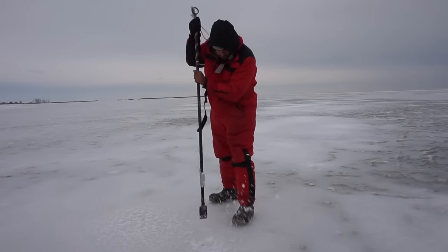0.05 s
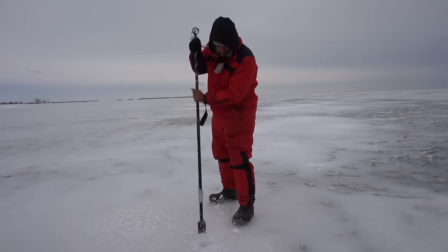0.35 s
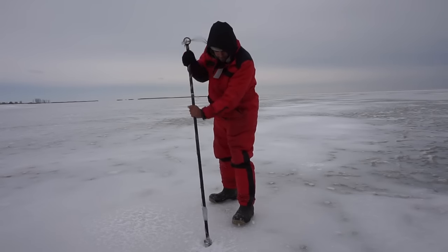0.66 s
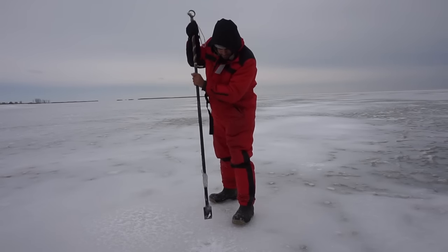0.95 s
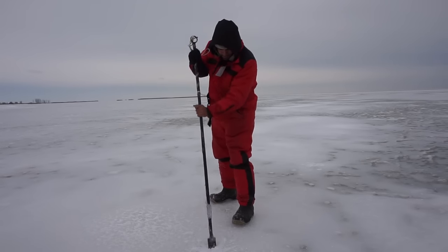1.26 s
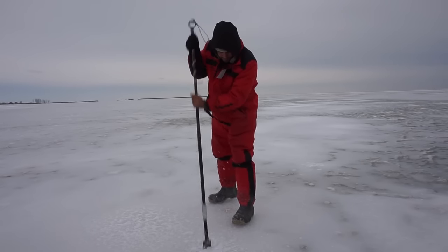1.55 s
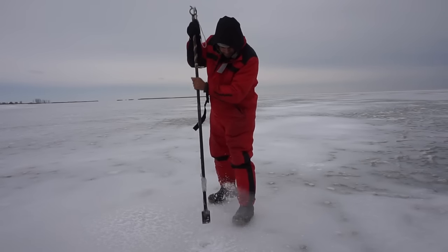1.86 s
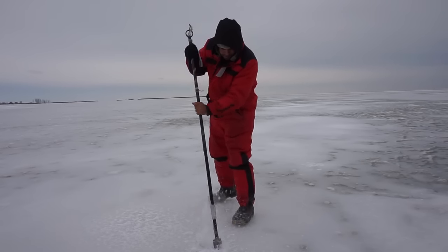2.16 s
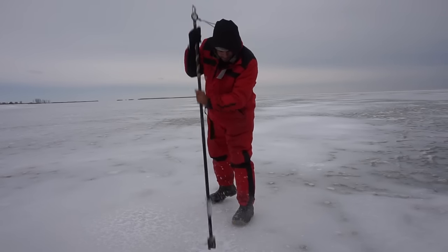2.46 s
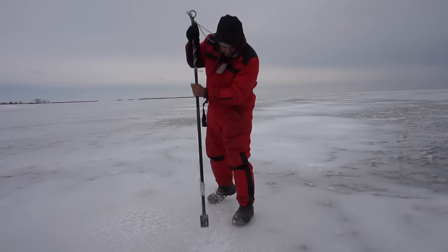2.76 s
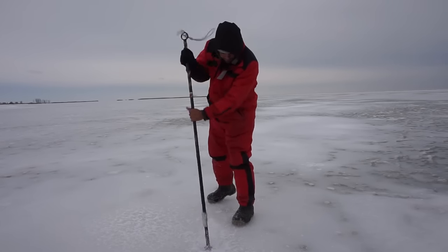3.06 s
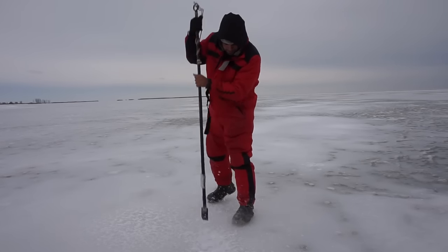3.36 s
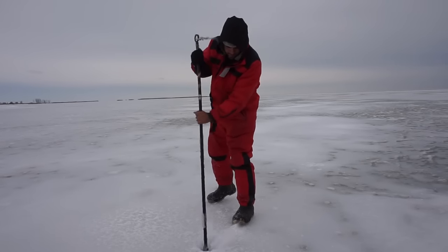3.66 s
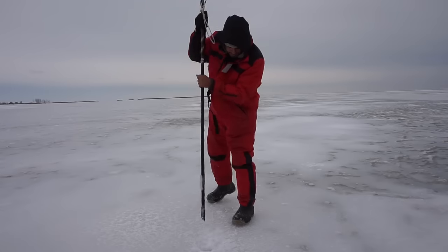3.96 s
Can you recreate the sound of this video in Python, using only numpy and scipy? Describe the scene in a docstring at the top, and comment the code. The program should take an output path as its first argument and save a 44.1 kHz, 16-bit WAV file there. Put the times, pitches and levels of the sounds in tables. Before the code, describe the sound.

A long steel bar chops into lake ice in steady blows, with wind buffeting.

```python
"""Wind rumbles, buffets and ticks on a pair of close microphone ports throughout, and boots scuff on lake ice.
From 0.25 s a long steel bar is driven in eight times, about twice a second: each blow crushes the ice for a few
hundredths of a second and rings the hand-damped bar. Chips scatter and tinkle, loudest after the first blow.
From 1 s the wind also slaps the ports. Near the end the boots scuff again and three dull knocks sound on the
ice."""
import sys
import numpy as np
from scipy import signal
from scipy.fft import rfft, irfft
from scipy.io import wavfile
from scipy.ndimage import uniform_filter1d

SR = 44100
rng = np.random.default_rng(int(sys.argv[2]) if len(sys.argv) > 2 else 0)


def file_out(sig):
    """Save sig as 16-bit WAV at sys.argv[1]."""
    # one column per channel
    cols = np.atleast_2d(sig).T
    # limit, then scale
    lim = np.clip(cols, -1, 1)
    pcm = np.round(lim * 32767).astype(np.int16)
    wavfile.write(sys.argv[1], SR, pcm)


N = 176400

# spectra of crushed ice, fine grit and pressure cusps: frequency_hz, relative_density_db
CRUNCH_SPECTRUM = [(300, -9.5), (720, -10), (1050, -14.5), (1450, -1.5), (2000, 3.5), (2550, -2),
                   (3300, -14), (3900, -18), (4900, -43), (9000, -37)]
FIZZ_SPECTRUM = [(3000, -62), (5000, -21), (6500, -15), (8000, -6), (9600, -1), (11500, 4.5), (13200, 0.5),
                 (15000, -9), (16500, 0)]
TICK_SPECTRUM = [(300, -5.5), (700, 18), (1020, 3.5), (1500, 10), (2100, 3.5), (3000, -20.5), (4500, -41)]
CRUNCH_PAN_DB, DEBRIS_PAN_DB, DEBRIS_WIDTH = -5, -2.5, 0.57


def blows():
    """Impact excitation: the blade crushes and splinters the ice, and the fractures ring the steel."""
    # start_s, attack_s, bite_s, crunch_db, splinter_db, bar_db, blade_db
    strikes = [(0.249, 0.00065, 0.025, -24.5, -28.5, -42, -41),
               (0.7365, 0.0053, 0.0041, -27.5, -35, -38, -47),
               (1.2174, 0.0039, 0.015, -25.5, -29, -31, -23),
               (1.678, 0.0049, 0.022, -29.5, -36.5, -36, -53),
               (2.1385, 0.0047, 0.018, -32, -38.5, -37, -30), (2.5876, .004, 0.024, -34.5, -36, -39, -34),
               (3.11, 0.0046, 0.032, -30, -33, -31.5, -39), (3.68, 0.0091, 0.03, -31.5, -35, -35, -68)]
    # frequency_hz, relative_density_db
    splinter_spectrum = [(3000, -47), (5000, -22), (6300, -11.5), (7900, -4.5), (9400, 4), (12300, 4),
                         (15000, -10.5), (16500, -16)]
    soft_attack_s = 0.012  # soft ice yields slowly and crumbles longer: this attack doubles the decay

    def bites(layer, base_t60_s):
        return sum(amp(levels_db[layer]) * burst(s, attack, bite, base_t60_s * (1 + attack / soft_attack_s))
                   for s, attack, bite, *levels_db in strikes)
    crush, splinter, shake, ping = [bites(k, t60) for k, t60 in enumerate((0.057, 0.039, 0.02, 0.01))]
    cracking = cracks()
    steel = steel_bar(shake, ping)
    crunch = colour(crush * fractures() * swell(depth_db=1.7, rate_hz=220), CRUNCH_SPECTRUM)
    diffuse = 0.24 * colour(crush * fractures(), CRUNCH_SPECTRUM)
    body = delay_right(place(crunch + steel, diffuse, CRUNCH_PAN_DB), lag_s=25e-6)
    spray = place(splinter * fractures(), 0.5 * splinter * fractures(), pan_db=-0.3)
    return body + colour(spray, splinter_spectrum) + cracking


def steel_bar(shake, ping):
    """Modal resonance: noise under two envelopes drives the bar's damped modes and the blade's ping."""
    # pitch_hz, relative_db, t60_s
    modes = [(1363, -9.5, 0.21), (1490, 0.5, 0.079), (1880, 1, 0.11), (2150, -4.5, 0.15),
             (2310, 7.5, 0.063), (2620, -14.5, 0.15), (2763, 4, 0.02), (2890, 6, 0.057), (3230, 1, 0.057),
             (6600, -26, .06), (9500, -19, 0.14)]
    blade_hz, blade_t60_s = 1756, 0.055
    white = rng.standard_normal(N)  # sets the bar's modes together, and the blade, to unit gain for noise
    bar_gain = np.std(sum(amp(db) * ring(white, hz, t60) for hz, db, t60 in modes))
    blade_gain = np.std(ring(white, blade_hz, blade_t60_s))
    bar = sum(amp(db) * ring(shake * rng.standard_normal(N), hz, t60) for hz, db, t60 in modes)
    blade = ring(ping * fractures(), blade_hz, blade_t60_s)
    return bar / bar_gain + blade / blade_gain


def cracks():
    """Brittle failure: larger cracks within the blows radiate brief broadband snaps."""
    # start_s, level_db
    snaps = [(0.2495, -11), (0.2553, -15), (0.2728, -17), (0.2773, -16), (0.7423, -17), (1.2250, -17.5),
             (1.7012, -25.5), (2.1450, -19), (3.1247, -21.5)]
    # frequency_hz, relative_density_db
    spectrum = [(500, -29), (1100, -23.5), (1700, -4.5), (2600, 9), (3600, -13.5), (4900, -33), (6500, -17),
                (10000, -11.5), (15000, -13.5)]
    envelope = sum(amp(db) * burst(s, 0, 0.00058, t60_s=0.017) for s, db in snaps)
    return place(colour(envelope * fractures(), spectrum), 0, pan_db=-5.5)


def fractures():
    """Acoustic emission: ice gives way in tiny fractures that merge into a dense crackle."""
    return even(grains(per_s=5000, spread_db=0), span_s=0.004)


def chips():
    """Free vibration: each landing chip gives a short glassy ring, and grit as it shatters a little."""
    # start_s, level_db, pitch_hz, t60_s
    landings = [(.0278, -43, 13200, .012), (.0690, -25, 13100, 0.0086), (0.1066, -16.5, 11460, 0.011),
                (0.126, -27, 12700, 0.017), (.2074, -36, 13400, .012), (0.372, -23, 10200, 0.0087),
                (0.393, -19.5, 10860, 0.011), (0.414, -29, 12400, .03), (0.421, -24, 9250, 0.012),
                (0.4364, -28.5, 10100, 0.014), (.4519, -26, 9960, 0.011), (0.4864, -11.5, 9500, 0.013),
                (0.6056, -29, 13200, 0.031), (0.6163, -31, 11700, 0.042), (.7965, -30, 9900, 0.0068),
                (0.8828, -29.5, 10340, .01), (1.784, -31.5, 10940, .012), (2.4153, -34.5, 11860, 0.028),
                (2.6768, -36, 11260, 0.022), (2.9995, -39.5, 10040, 0.015), (3.6012, -34.5, 11200, 0.013)]
    rings, shatter = np.zeros(N), np.zeros(N)
    for s, db, hz, t60 in landings:
        rings += amp(db - 2) * np.sin(2 * np.pi * hz * (seconds() - s)) * burst(s, 0.0014, 0.00077, t60)
        shatter += amp(db - 3.5) * burst(s, 0.0005, 0.00075, t60_s=0.0083)
    grit = 0.55 * colour(shatter * fractures(), FIZZ_SPECTRUM)
    return place(rings + grit, 0, pan_db=-4.5)


def debris():
    """Shot noise: the many small impacts of sliding crumbs add up to a fizz and a lower rustle."""
    # time_s, fizz_db, rustle_db
    levels = [(0, -42.5, -54), (.22, -37, -52), (.3, -36.5, -43.5), (.35, -44.5, -56.5), (.42, -33, -48.5),
              (.54, -46.5, -57), (.69, -39, -49.5), (.8, -45.5, -58.5), (1.08, -47.5, -57),
              (1.27, -59, -61.5), (1.6, -61, -62.5), (1.84, -58, -65), (1.89, -59.5, -56),
              (2.08, -62, -64.5), (2.2, -54.5, -60), (2.5, -57.5, -61.5), (2.65, -54, -58), (2.8, -67, -72),
              (3.05, -60.5, -67), (3.18, -47.5, -52), (3.3, -56.5, -57.5), (3.45, -49.5, -57.5),
              (3.62, -52, -60), (3.8, -54, -53.5), (4, -57, -65.5)]
    # frequency_hz, relative_density_db
    rustle_spectrum = [(900, -16.5), (1500, -1.5), (2400, 7.5), (3300, -3), (4500, -22.5), (7000, -53)]

    def skitter(spectrum):
        mid, side = [even(grains(per_s=3500, spread_db=3.5), span_s=0.2) for _ in range(2)]
        return colour(place(mid, DEBRIS_WIDTH * side, DEBRIS_PAN_DB), spectrum)
    fizz_gain, rustle_gain = in_time(levels)
    showers = swell(depth_db=3, rate_hz=36.3)
    fizz = amp(-3) * skitter(FIZZ_SPECTRUM) + amp(-6.5) * tinkles()
    rustle = swell(depth_db=2, rate_hz=18) * skitter(rustle_spectrum)
    return showers * (fizz_gain * fizz + rustle_gain * rustle)


def tinkles():
    """Impulse responses: random impacts ring tiny pieces of ice, scattered left and right."""
    pitches_hz = np.geomspace(8900, 13400, 30)
    rings = np.zeros((2, N))
    for k, hz in enumerate(pitches_hz):
        impacts = grains(per_s=980 / len(pitches_hz), spread_db=4.5)
        rings += place(ring(impacts, hz, t60_s=0.012), 0, DEBRIS_PAN_DB + 3 * (-1) ** k)
    return even(rings, span_s=0.13)


def knocks():
    """Damped impacts: three dull clacks on the crushed ice near the end."""
    # start_s, level_db, t60_s
    falls = [(3.558, -46, 0.028), (3.777, -36, 0.064), (3.808, -47, 0.047)]
    envelope = sum(amp(db) * burst(s, 0.001, 0.0013, t60) for s, db, t60 in falls)
    return place(colour(envelope * fractures(), CRUNCH_SPECTRUM), 0, CRUNCH_PAN_DB)


def scuffs():
    """Fracture under load: the crust breaks beneath the boots in short crunches."""
    # start_s, level_db, t60_s
    steps = [(0.104, -36, 0.049), (.185, -44, 0.05), (0.206, -35.5, 0.062), (.371, -37, 0.015),
             (.389, -34.5, 0.039), (0.417, -40, 0.11), (3.258, -41, 0.017), (3.3725, -36, 0.03),
             (3.870, -32.5, 0.0051)]
    # frequency_hz, relative_density_db
    spectrum = [(900, -32), (1500, -4.5), (2400, 3), (3500, -1), (4700, -30.5), (5900, -1), (7500, -15),
                (10000, -7), (15000, -20)]
    load = sum(amp(db) * burst(s, 0.0026, 0.00067, t60) for s, db, t60 in steps)
    return colour(place(load * fractures(), DEBRIS_WIDTH * load * fractures(), DEBRIS_PAN_DB), spectrum)


def wind():
    """Turbulent pressure on the ports: rumble with thumping eddies, buffeting, flutter and ticks."""
    # time_s, buffet_db, flutter_db
    gust_levels = [(0, -29, -52), (.15, -29, -61), (.27, -27.5, -42), (.36, -31, -87), (.49, -27, -40),
                   (.57, -29, -61), (.7, -27, -39.5), (.9, -27.5, -47.5), (1.07, -24, -38),
                   (1.17, -24.5, -39), (1.37, -25.5, -31.5), (1.42, -29, -40), (1.47, -31, -60.5),
                   (1.58, -23.5, -32), (1.72, -27.5, -49), (1.9, -24.5, -40), (1.98, -30.5, -45.5),
                   (2.2, -25.5, -40.5), (2.38, -26, -40.5), (2.52, -25.5, -41), (2.8, -27, -43.5),
                   (3.2, -24.5, -40), (3.32, -28.5, -49.5), (3.6, -25.5, -42.5), (4, -25.5, -49)]
    # time_s, level_db
    rumble_levels = [(0, -26.5), (.4, -22), (.7, -29), (.95, -19.5), (1.35, -27.5), (1.7, -25.5),
                     (2.05, -28), (2.4, -25.5), (2.9, -25), (3.4, -23.5), (4, -21)]
    # centre_s, level_db, half_length_s
    eddies = [(0.488, -17, 0.016), (1.003, -20, 0.035), (1.233, -16, .012), (1.288, -14, 0.019),
              (1.398, -14.5, 0.017), (1.536, -15, 0.023), (1.843, -18, 0.028), (3.094, -13, 0.0094)]
    # three bands of turbulence: frequency_hz, relative_density_db
    rumble_spectrum = [(12, -38), (25, -16), (40, -2.5), (60, 3), (80, 2), (110, -12), (200, -42),
                       (400, -81.5)]
    buffet_spectrum = [(50, -33), (110, -9), (180, 1), (310, -0.5), (400, -8), (520, -16.5), (800, -26),
                       (1500, -102.5)]
    flutter_spectrum = [(250, -11), (450, 2.5), (750, -8), (1020, -12.5), (1500, -13), (2200, -28),
                        (3200, -76), (4800, -62)]
    buffet_gain, flutter_gain = in_time(gust_levels)
    eddy_power = sum(amp(db) ** 2 * np.exp(-((seconds() - s) / half) ** 2) for s, db, half in eddies)
    rumble_power = in_time(rumble_levels)[0] ** 2 + eddy_power
    flutter = amp(-2) * port_ticks() + amp(-2.5) * turbulence(flutter_spectrum)
    rumble = np.sqrt(rumble_power) * turbulence(rumble_spectrum)
    lumps = swell(depth_db=1, rate_hz=14)
    return rumble + lumps * (buffet_gain * turbulence(buffet_spectrum) + flutter_gain * flutter)


def turbulence(spectrum):
    """Convection: pressure noise sweeps past the left port, then the right, staying partly coherent."""
    # likeness of the two ports: frequency_hz, coherence, left_lead_rad
    ports = [(30, 0.85, .2), (62.5, 0.85, 0.37), (106, 0.88, 0.93), (205, 0.4, 1.62), (340, .62, 2.204),
             (700, 0.61, 2.6), (1500, 0.49, 2.4)]
    coherence, lead = per_bin(ports)
    left, independent = rfft(rng.standard_normal((2, 2 * N)))
    right = (coherence * left + np.sqrt(1 - coherence ** 2) * independent) * np.exp(-1j * lead)
    pressure = irfft(np.array([left, right]) * amp(per_bin(spectrum)[0]))[:, :N]
    return even(rms_one(pressure), span_s=0.054)


def port_ticks():
    """A random pulse train: pressure cusps, sizes spread evenly in dB, in antiphase at the two ports."""
    per_s, spread_db = 120, 39.5
    gaps, sizes, signs = rng.random((3000, 3)).T
    at = (np.cumsum(2 * gaps) / per_s * SR).astype(int)
    heights = amp(-spread_db * sizes) * np.sign(signs - 0.5)
    clicks = np.zeros(N)
    clicks[at[at < N]] = heights[at < N]
    ticks = colour(rms_one(clicks), TICK_SPECTRUM)
    return place(0.45 * ticks, -ticks, pan_db=2)


def wind_slaps():
    """Pressure impulses: the hardest single cusps of the wind, in antiphase at the two ports."""
    # start_s, relative_db
    slaps = [(1.029, -18), (1.482, -27), (1.622, -15), (2.016, -19), (2.351, -10.5), (2.7728, -15.5),
             (2.7998, -15), (2.8748, -15.5), (2.996, -17), (3.223, -9.5)]
    clicks = np.zeros(N)
    for s, db in slaps:
        clicks[int(s * SR)] = amp(db)
    cusps = 2.2 * colour(clicks, TICK_SPECTRUM)
    return place(0.4 * cusps, -cusps, pan_db=1.5)


def amp(db):
    """Decibels to amplitude ratio."""
    return 10 ** (np.asarray(db) / 20)


def rms_one(x):
    """Normalisation to rms 1."""
    return x / np.sqrt(np.mean(x ** 2) + 1e-20)


def seconds():
    """Time of each sample."""
    return np.arange(N) / SR


def in_time(rows):
    """Gain curves interpolated in decibels from rows of time_s, level_db, ..."""
    s, *columns = np.transpose(rows)
    return [amp(np.interp(seconds(), s, c)) for c in columns]


def per_bin(rows):
    """A table's columns interpolated in log frequency at every FFT bin."""
    hz, *columns = np.transpose(rows)
    bin_hz = np.arange(N + 1) * SR / (2 * N)
    return [np.interp(np.log(bin_hz + 1), np.log(hz), c) for c in columns]


def colour(x, spectrum):
    """Minimum-phase filter with the given spectrum; white noise keeps its power."""
    cepstrum = irfft(np.log(rms_one(amp(per_bin(spectrum)[0]))))
    causal_fold = np.r_[1, np.full(N - 1, 2), 1, np.zeros(N - 1)]
    return irfft(rfft(x, 2 * N) * np.exp(rfft(cepstrum * causal_fold)))[..., :N]


def even(x, span_s):
    """Running normalisation: holds the level at rms 1 over the given span."""
    power = np.mean(np.atleast_2d(x) ** 2, axis=0)
    return x / np.sqrt(np.abs(uniform_filter1d(power, max(int(span_s * SR), 2))) + 1e-6)


def grains(per_s, spread_db):
    """A Poisson process of clicks with random signs, rms 1."""
    sizes = amp(spread_db * np.minimum(rng.exponential(1, N), 4))
    return rms_one(sizes * rng.choice([-1, 1], N) * (rng.random(N) < per_s / SR))


def ring(x, hz, t60_s):
    """Damped oscillator: a unit click sets a sine of height 1 ringing."""
    radius, angle = amp(-60 / (t60_s * SR)), 2 * np.pi * hz / SR
    return signal.lfilter([0, np.sin(angle)], [1, -2 * radius * np.cos(angle), radius ** 2], x + 1e-18)


def burst(start_s, attack_s, length_s, t60_s):
    """Envelope: a linear rise, and exponential decay from length_s after the start."""
    t = seconds() - start_s
    return np.clip(t / max(attack_s, 1e-4), 0, 1) * amp(-60 * np.clip((t - length_s) / t60_s, 0, 4))


def swell(depth_db, rate_hz):
    """Random amplitude modulation: a wandering gain of rms 1."""
    points = rng.standard_normal(2000)
    return rms_one(amp(depth_db * np.interp(seconds() * 2 * rate_hz, np.arange(len(points)), points)))


def place(mid, side, pan_db):
    """Mid-side stereo with a level difference; positive pan_db favours the left."""
    return np.array([(mid + side) * amp(pan_db / 2), (mid - side) * amp(-pan_db / 2)])


def delay_right(x, lag_s):
    """Path difference: the sound reaches the right port a little later."""
    hz = np.arange(N // 2 + 1) * SR / N
    return np.array([x[0], irfft(rfft(x[1]) * np.exp(-2j * np.pi * hz * lag_s), N)])


def scene():
    """Superposition over open ice, with no echoes."""
    return blows() + chips() + debris() + knocks() + scuffs() + wind() + wind_slaps()


def record(dry):
    """Band limiting: an elliptic low-pass cuts the top steeply."""
    cutoff_hz = 15650
    return signal.sosfilt(signal.ellip(10, 0.1, 80, cutoff_hz, fs=SR, output="sos"), dry)


dry = scene()
out = record(dry)
file_out(out)
```